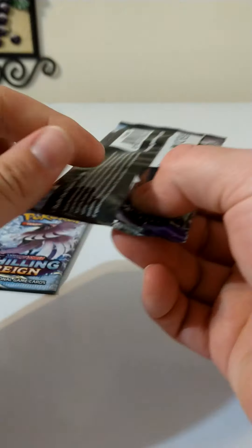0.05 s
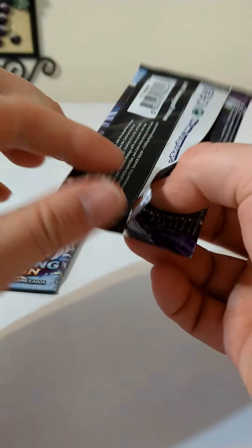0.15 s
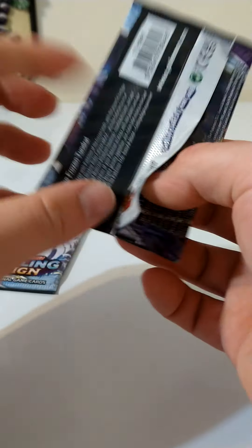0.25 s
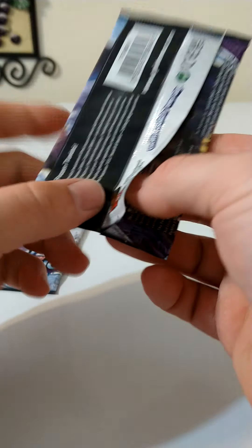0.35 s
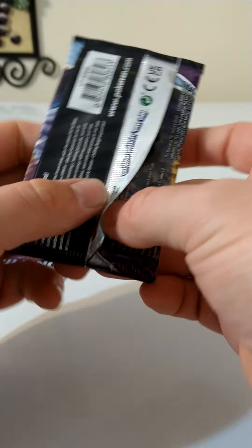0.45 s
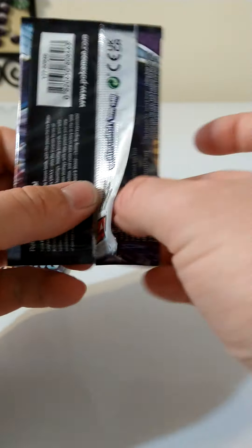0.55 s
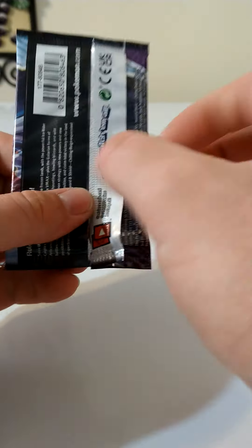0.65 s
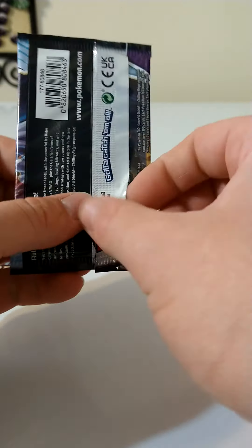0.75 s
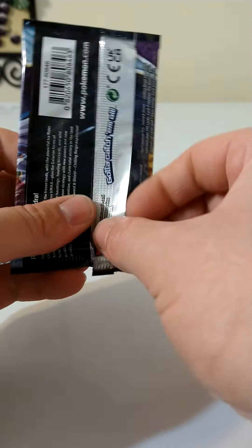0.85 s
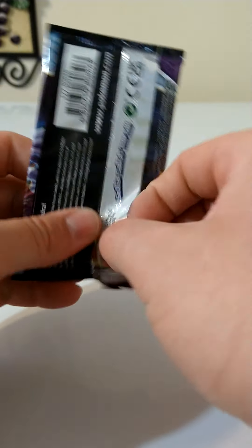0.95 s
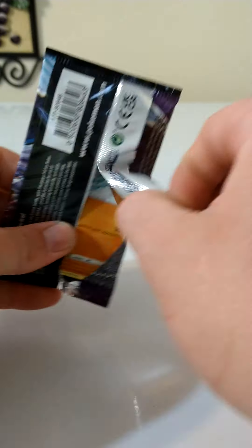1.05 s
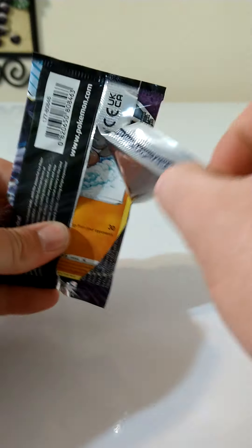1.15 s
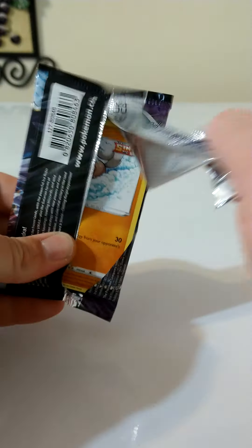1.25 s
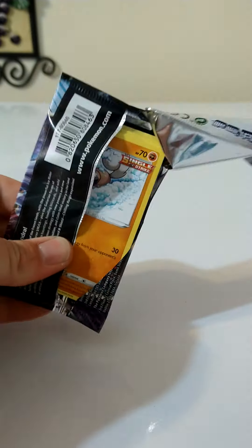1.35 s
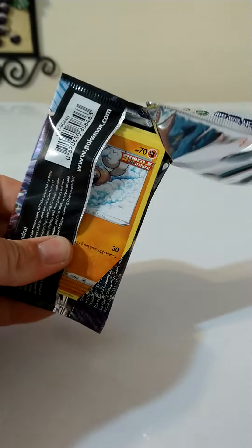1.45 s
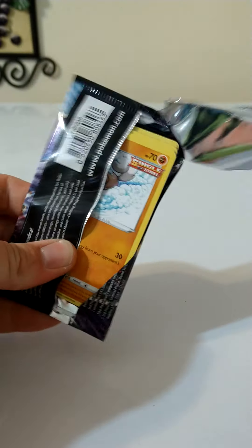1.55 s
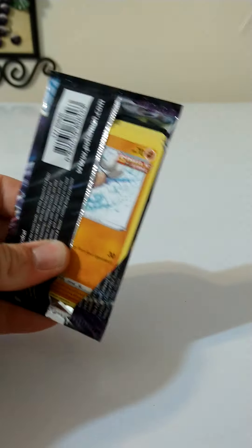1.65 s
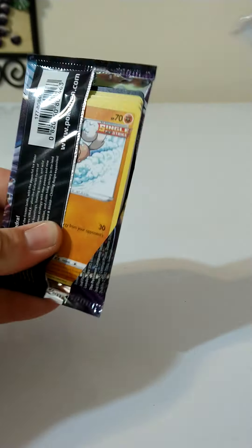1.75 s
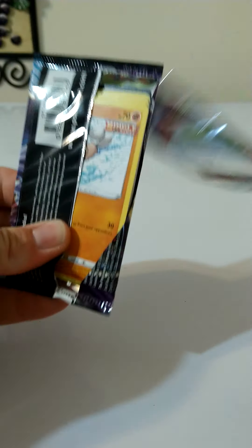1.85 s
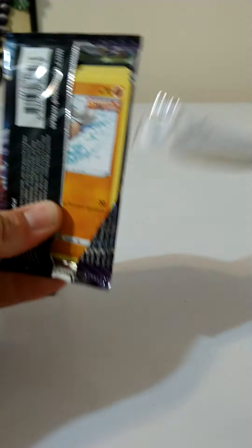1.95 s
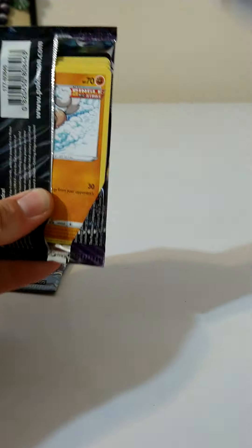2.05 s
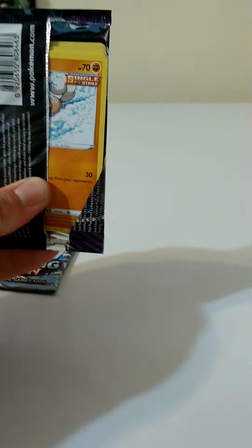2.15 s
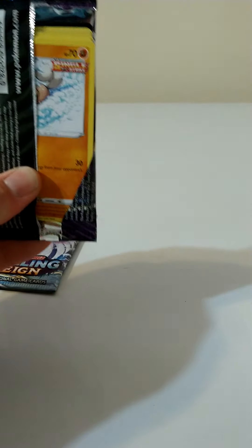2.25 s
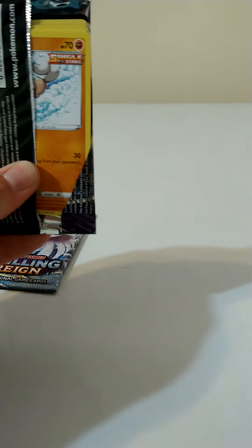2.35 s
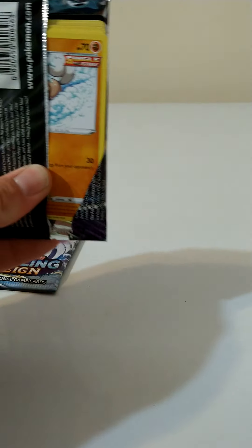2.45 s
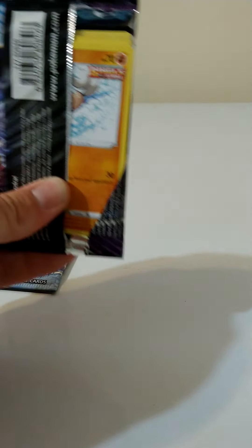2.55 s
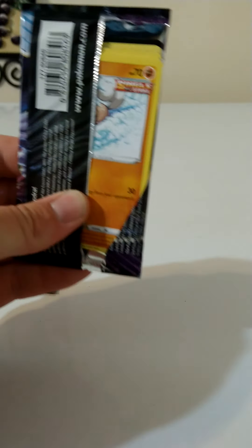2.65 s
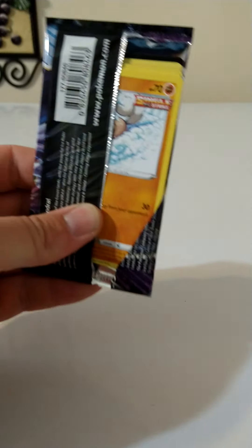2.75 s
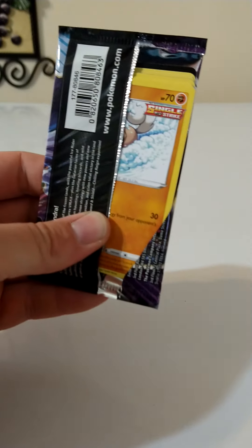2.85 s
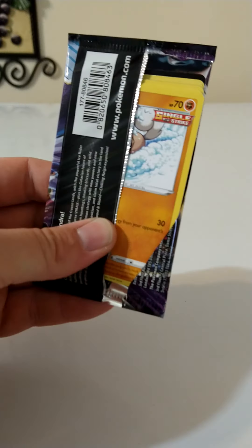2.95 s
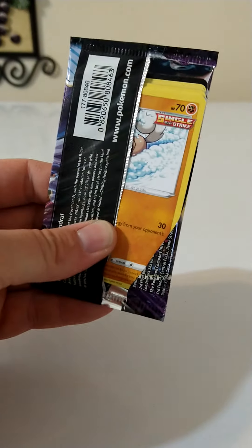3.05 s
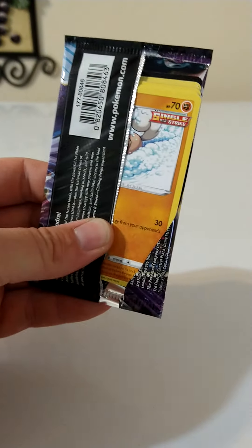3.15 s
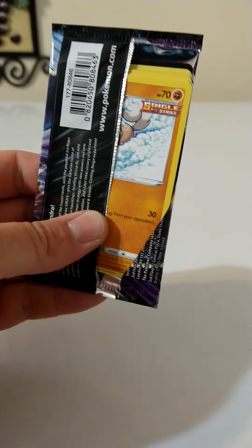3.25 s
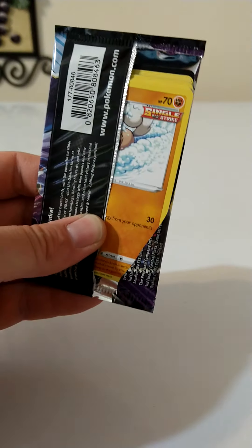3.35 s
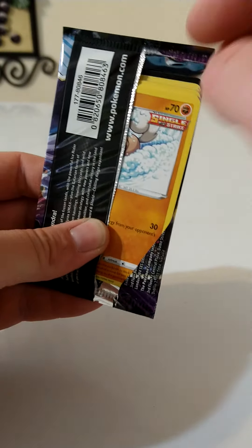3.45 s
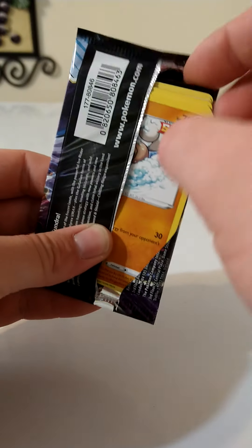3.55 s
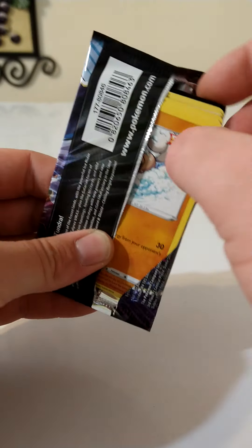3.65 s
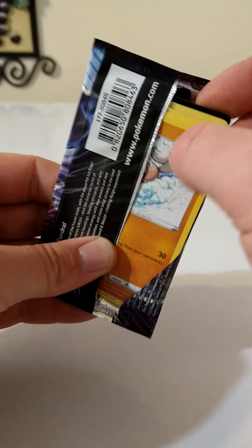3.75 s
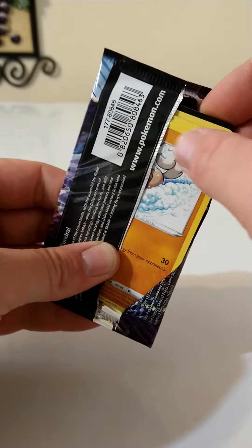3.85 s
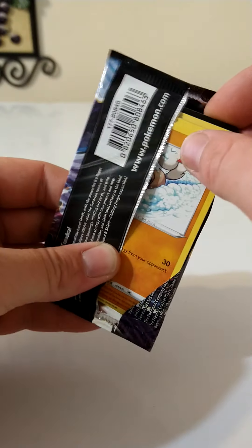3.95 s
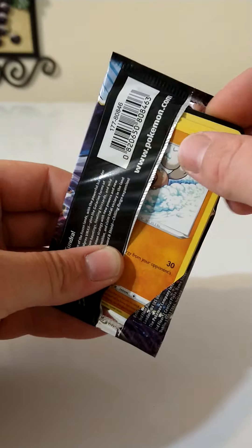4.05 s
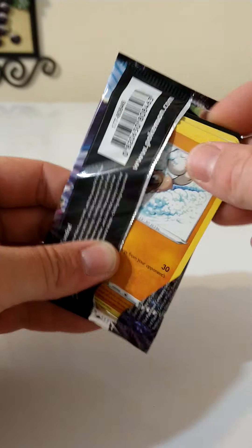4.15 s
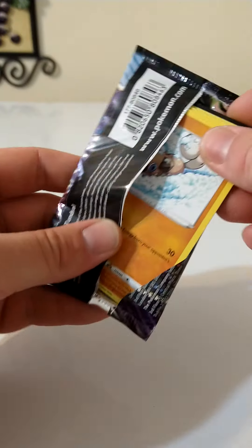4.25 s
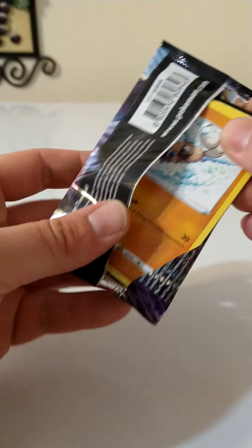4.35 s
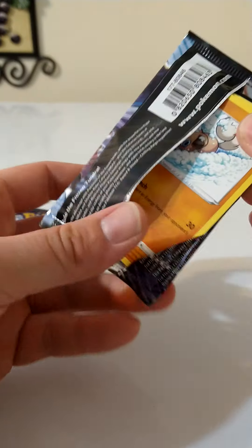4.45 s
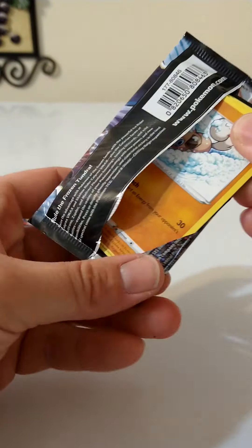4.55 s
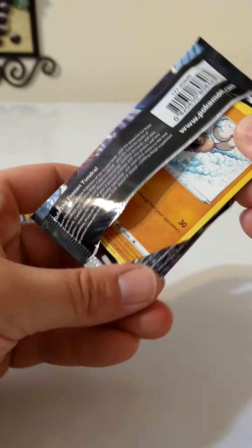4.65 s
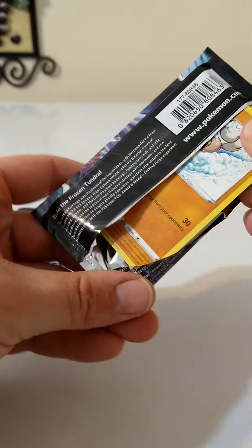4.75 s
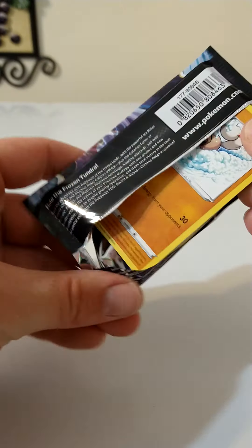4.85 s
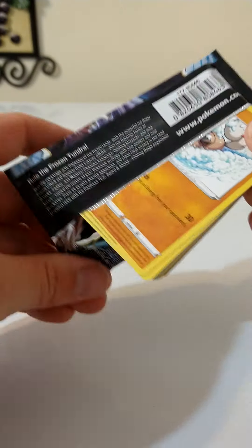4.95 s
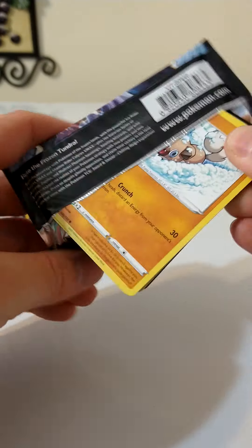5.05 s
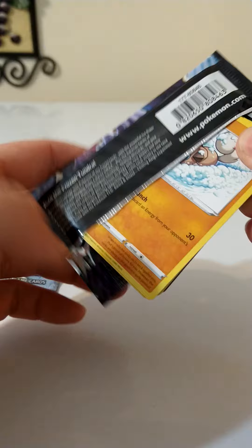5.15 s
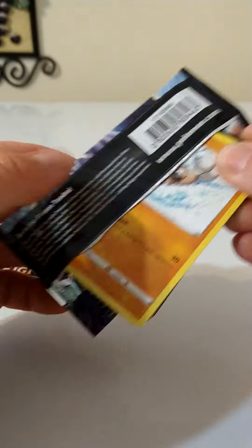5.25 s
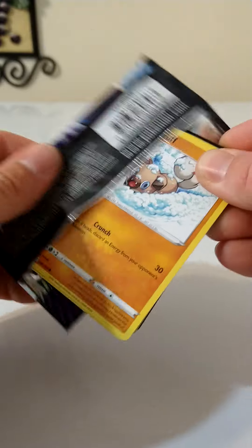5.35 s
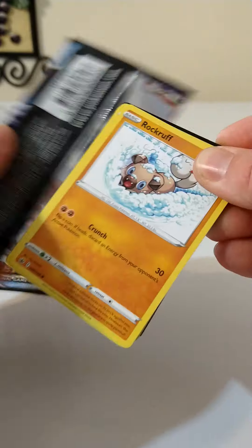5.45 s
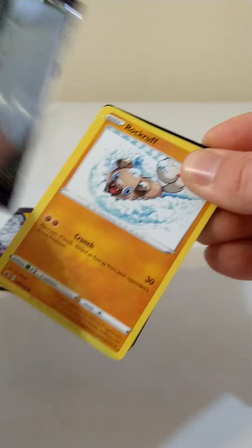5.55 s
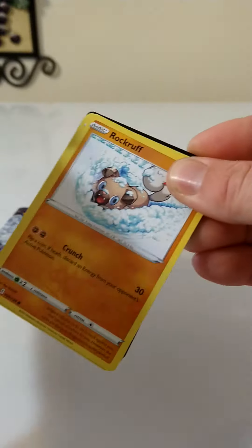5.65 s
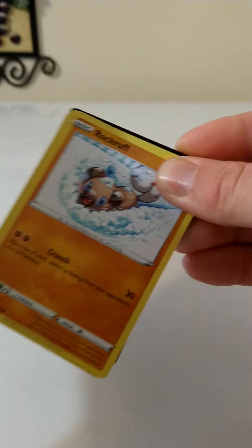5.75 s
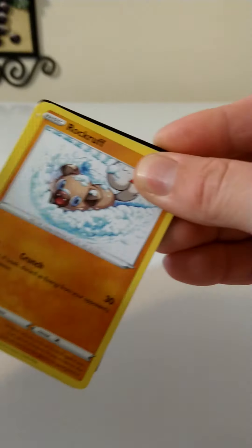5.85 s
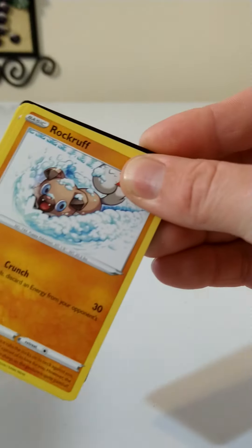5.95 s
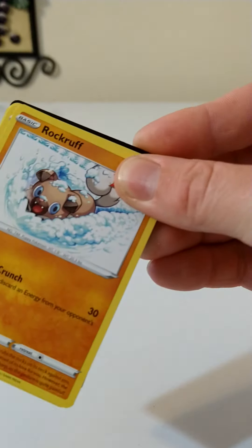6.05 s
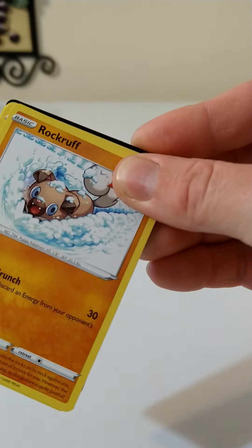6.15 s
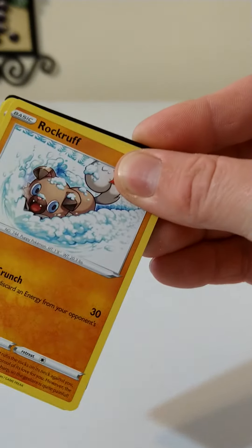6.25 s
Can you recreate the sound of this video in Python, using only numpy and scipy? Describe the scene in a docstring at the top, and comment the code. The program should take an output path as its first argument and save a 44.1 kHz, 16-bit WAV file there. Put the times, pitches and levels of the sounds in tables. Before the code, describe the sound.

Close foil crackling in a quiet room: faint ticks, a loud seam tear, sparse crinkles, then bright snaps, rustling and soft low bumps.

```python
"""Tearing a foil card pack

Hands peel open the sealed seam of a foil card pack, close to two microphones in a small quiet room.
Buckling facets are noise bursts with ringing modes; rips, creaks and rubbing are trains of tiny fractures.
Soft low bumps reach mostly the left microphone; echoes, a diffuse tail and still room air surround it all."""
import sys
import numpy as np
from scipy import signal
from scipy.fft import rfft, irfft
from scipy.io import wavfile
from scipy.ndimage import uniform_filter1d

SR = 44100
rng = np.random.default_rng(int(sys.argv[2]) if len(sys.argv) > 2 else 0)


def inscribe(sig):
    """Save sig as 16-bit PCM at rate SR to the path in sys.argv[1].

    A 1-D sig is mono; a 2-D sig holds one channel per row.
    Samples are clipped to [-1, 1] before scaling.
    """
    pcm = np.round(np.clip(np.atleast_2d(sig).T, -1, 1) * 32767)
    wavfile.write(sys.argv[1], SR, pcm.astype(np.int16))


N = 277389  # length in samples


def amp(db):
    """Logarithmic level: decibels become an amplitude ratio."""
    return 10 ** (np.asarray(db) / 20)


def unit(x):
    """Mean-square normalisation: scales a signal to rms 1."""
    return x / np.sqrt(np.mean(x ** 2) + 1e-20)


def read(points, hz):
    """Interpolation on a log-frequency axis, as the ear spaces pitch."""
    point_hz, value = np.transpose(points)
    return np.interp(np.log(hz + 1), np.log(point_hz + 1), value)


def sides(db):
    """Interaural level difference: left and right gains for left minus right in dB."""
    return amp(np.array([[db], [-db]]) / 2)


def add(mix, s, sound):
    """Superposition: adds a stereo sound to the mix at time s in seconds."""
    part = mix[:, max(round(s * SR), 0):][:, :sound.shape[1]]
    part += sound[:, :part.shape[1]]


def colour(x, points, size=2048):
    """Minimum-phase filtering: shapes the spectrum with energy 1 and keeps the fronts of clicks sharp."""
    log_gain = np.log(amp(read(points, abs(np.fft.fftfreq(size, 1 / SR)))))
    # the Hilbert transform of the log gain gives the minimum phase
    spectrum = np.exp(np.conj(signal.hilbert(log_gain)))
    taps = np.fft.ifft(spectrum).real[:size // 2]
    taps = taps / np.linalg.norm(taps)
    return signal.fftconvolve(x, taps[None], axes=1)[:, :x.shape[1]]


def pair(x, same):
    """Coherence: mixes two unrelated channels to the given correlation."""
    same = np.clip(same, -1, 1)
    right = same * x[0] + np.sqrt(1 - same ** 2) * x[1]
    return np.array([x[0], right])


def resonate(x, hz, width_hz):
    """Damped resonance: one broad peak of gain 1."""
    b, a = signal.iirpeak(hz, hz / width_hz, SR)
    return signal.lfilter(b, a, x)


def swell(start, crest, end, crest_db, rise_db, fall_db):
    """Force envelope: a movement builds to a crest, eases off and lets go, in straight lines of dB."""
    t = np.arange(N) / SR
    level_db = np.interp(t, [start, crest, end], [crest_db - rise_db, crest_db, crest_db - fall_db])
    return amp(level_db) * ((t >= start) & (t < end))


def fractures(per_s, spread_db, size=300):
    """Shot noise: a random train of tiny bursts of exponentially scattered level, scaled to rms 1."""
    level_db = spread_db * np.minimum(rng.exponential(1, N), 2.5)
    heights = amp(level_db) * (rng.random(N) < per_s / SR)
    t = np.arange(size) / SR
    burst = t * np.exp(-t / 0.00047)
    power = signal.oaconvolve(heights ** 2, burst ** 2)[:N]
    return unit(np.sqrt(abs(power)) * rng.standard_normal((2, N)))


# Spectrum of the still air. Each row: frequency in Hz, relative level in dB.
AIR_SPECTRUM = [(20, -48), (32, -26), (55, -6), (85, -11), (115, -6), (160, -12), (240, -8), (380, -9),
                (640, -14), (1000, -21), (2500, -25.5), (8000, -29), (11000, -35.5), (16000, -40)]
# Likeness of left and right in the still air. Each row: frequency in Hz, correlation from -1 to 1.
AIR_COHERENCE = [(60, 1), (130, 0.91), (290, 0.9), (640, 0.029), (1410, 0.94), (3100, -0.45), (6820, -0.96),
                 (15000, 0.16)]
AIR_DB = -64.0  # rms


def quiet():
    """Stationary noise: a low ventilation murmur under faint hiss, with its own coherence in each band."""
    hz = np.fft.rfftfreq(N, 1 / SR)
    bins = pair(rfft(rng.standard_normal((2, N))), read(AIR_COHERENCE, hz))
    return amp(AIR_DB) * unit(irfft(bins * amp(read(AIR_SPECTRUM, hz)), N))


# Echoes from hands and table top. Each row: delay in seconds, left gain, right gain.
ECHOES = [(.0021, 0.2, -.1), (.0043, -0.23, .12), (.0064, .1, .09)]
# Reverberation time of the diffuse tail. Each row: frequency in Hz, time to fall 60 dB in seconds.
ROOM_T60 = [(300, 0.19), (800, .3), (2000, 0.19), (5500, 0.17), (9000, 0.17), (15000, 0.15)]
# Starting spectrum of the tail. Each row: frequency in Hz, relative level in dB.
ROOM_COLOUR = [(100, -10.5), (500, -10.5), (900, -3), (2000, -3.5), (4000, -6.5), (7000, -4.5),
               (11000, -8.5), (15000, -3)]


def room(x, count=3):
    """Reverberation: close reflections, then exponentially decaying tails that take turns."""
    out = np.zeros((2, N))
    for delay, left, right in ECHOES:
        add(out, delay, x * np.array([[left], [right]]))
    for k in range(count):
        hz, t, z = signal.stft(rng.standard_normal((2, SR // 2)), SR, nperseg=256)
        decay_db = read(ROOM_COLOUR, hz)[:, None] - 60 * t / read(ROOM_T60, hz)[:, None]
        tail = signal.istft(z * amp(decay_db), SR, nperseg=256)[1]
        tail_t = np.arange(tail.shape[1]) / SR
        tail = tail * (1 - np.exp(-(tail_t / 0.0017) ** 2))  # soft onset
        tail = tail / np.linalg.norm(tail[0])
        # the share of each tail swings at 3.5 Hz while the summed power stays even
        share = np.sqrt(2 / count) * np.cos(np.pi * (7 * np.arange(N) / SR + k / count))
        out += amp(-6.5) * signal.fftconvolve(x * share, tail, axes=1)[:, :N]
    return out


# Soft low bumps. Each row: start in seconds, nominal level in dB, frequency in Hz.
BUMPS = [(1.202, -45, 67.4), (1.411, -43, 155), (1.518, -40, 86), (3.189, -48.5, 110), (5.122, -43, 86),
         (5.191, -37, 104), (5.354, -35.5, 104.3), (5.465, -38, 88), (5.52, -36.5, 89), (5.603, -37.5, 123),
         (5.734, -35.5, 129), (5.78, -36, 76), (5.827, -38.5, 104.7), (5.865, -28.5, 99), (5.908, -34, 93),
         (5.954, -30.5, 78), (6.039, -46, 115)]
# Spectrum of their rumble. Each row: frequency in Hz, relative level in dB.
RUMBLE_SPECTRUM = [(20, -30), (50, -8), (90, 2.5), (140, -3.5), (220, -14.5), (400, -30.5), (1000, -69)]


def bumps(size=6000):
    """Near-field pressure pulses: a low push and ragged rumble, almost wholly on the left microphone."""
    lead = 0.025  # s of swelling before the start
    t = np.arange(size) / SR - lead
    out = np.zeros((2, N))
    for s, level_db, hz in BUMPS:
        push = np.exp(-((t - .007) / 0.0099) ** 2) * np.sin(2 * np.pi * hz * t)
        noise = rng.standard_normal((1, size)) * np.exp(-abs(t) / 0.017)
        rumble = unit(colour(noise, RUMBLE_SPECTRUM))
        bump = amp(level_db) * (0.59 * push + 0.18 * rumble)
        add(out, s - lead, bump * amp([[3.0], [-20.0]]))
    return out


# Strokes of fingers and cards over the foil.
# Each row: start in seconds, crest in seconds, end in seconds, crest drive level in dB.
STROKES = [(0, .03, 1.5, -57.5), (1.053, 1.364, 2.4, -52.5), (2.303, 2.354, 2.56, -64),
           (2.55, 2.78, 3.2, -71.5), (3.07, 3.17, 3.34, -65.5), (3.66, 3.738, 4.54, -65.5),
           (4.1, 4.26, 4.42, -63.5), (4.42, 4.48, 4.58, -56.5), (4.718, 4.806, 4.9, -50.5),
           (4.925, 5.145, 5.43, -52), (5.599, 5.777, 5.88, -50.5), (5.873, 5.95, 6.15, -65)]
STROKE_RISE_DB, STROKE_FALL_DB = 14, 13
HOLD_DB = -82.5  # drive level of the resting grip


def rubbing():
    """Friction drive: all the strokes, with softened ends, over the faint rub of a resting hand."""
    strokes = sum(swell(*row, STROKE_RISE_DB, STROKE_FALL_DB) for row in STROKES)
    return uniform_filter1d(strokes, size=900) + amp(HOLD_DB)


# Spectrum of skin and cards on foil. Each row: frequency in Hz, relative level in dB.
RUB_SPECTRUM = [(1060, -42), (1800, -10.5), (2920, -11), (4370, -6.5), (5200, -9), (7090, -6), (11700, -18),
                (13900, -20), (16000, -22)]


def slide():
    """Sliding friction: skin and cards drag over the foil as a dense train of small slips."""
    slips = fractures(per_s=1300, spread_db=-0.5)
    return amp(-4.5) * colour(slips * rubbing(), RUB_SPECTRUM)


# Tugs that strain the sealed seam before it gives.
# Each row: start in seconds, crest in seconds, end in seconds, crest drive level in dB.
TUGS = [(.845, 0.853, .96, -55), (.96, 0.987, 1.04, -53), (1.045, 1.07, 1.1, -60), (1.1, 1.12, 1.16, -31)]
TUG_RISE_DB, TUG_FALL_DB = 16, 14
# Band of the stretched foil. Each row: frequency in Hz, relative level in dB.
CREAK_SPECTRUM = [(3000, -36), (4600, -14.5), (5200, 2.5), (5900, -13.5), (7400, -4.5), (9000, -27.5),
                  (14000, -33.5)]


def creak():
    """Fibre fracture under strain: parting glue excites a narrow band of the stretched foil."""
    strain = sum(swell(*row, TUG_RISE_DB, TUG_FALL_DB) for row in TUGS)
    return colour(fractures(per_s=1500, spread_db=5.5) * strain, CREAK_SPECTRUM)


MEDIUM_HZ, MEDIUM_DB = 6450, -25.5  # ring and level of a medium snap
TICK_DB, TICK_SCATTER_DB = 11.5, 2.5  # nominal level above the rubbing drive, and its scatter


def stray_ticks(count=40):
    """Random buckling: small facets give way at levels that follow the rubbing drive."""
    rub_db = 20 * np.log10(abs(rubbing()) + 1e-6)
    places, chance = rng.integers(0, N, count), rng.standard_normal((count, 3))
    rows = []
    for at, (size, pitch, side) in zip(places, chance):
        level_db = rub_db[at] + TICK_DB + TICK_SCATTER_DB * size
        rows.append((at / SR, level_db, MEDIUM_HZ * 2 ** (.3 * pitch), 4.8 * side))
    return rows


# mean wait in seconds, level relative to the snap in dB, pitch scatter in octaves
FOLLOW_S, FOLLOW_DB, FOLLOW_OCTAVES = .005, -20, 0.22


def neighbours(count=2):
    """Cascade buckling: each snap tips its neighbours over, weaker and at uneven waits."""
    rows = []
    for s, peak_db, hz, _, pan_db in SNAPS:
        wait, size, pitch, side = rng.uniform(-1, 1, (count, 4)).T
        times = s + np.cumsum(FOLLOW_S * (1 + .7 * wait))
        levels_db = peak_db + FOLLOW_DB + 3.5 * size
        rows += zip(times, levels_db, hz * 2 ** (FOLLOW_OCTAVES * pitch), pan_db + 4.0 * side)
    return rows


def ring(peak_db, hz, pan_db, count=4, size=500):
    """Modal vibration: a cluster of close, damped modes, detuned and phased apart on each side."""
    t = np.arange(size) / SR
    detune, phase = rng.uniform(-1, 1, (2, count, 2, 1))
    modes = np.sin(2 * np.pi * (hz * (1 + .13 * detune) * t + phase)).sum(0)
    envelope = (t / .0005) ** 2 * np.exp(-t / 0.00068)
    return amp(peak_db - 16.5) * unit(modes * envelope) * sides(pan_db)


CRACK_S = .00046  # time constant of a facet flipping


def facet_flip(t):
    """Snap-through: a sudden rise and exponential fall as a facet changes shape."""
    return (t / CRACK_S) ** 2 * np.exp(-t / CRACK_S)


# Spectrum of the foil sheet. Each row: frequency in Hz, relative level in dB.
FOIL_SPECTRUM = [(300, -37), (1000, -27), (2000, -11), (2850, -6.5), (3500, 0), (5500, 1), (7800, 0.5),
                 (10000, 0), (12000, -8.5), (14000, -7), (16000, -14.5)]


def crinkles(size=500):
    """Small-scale buckling: each facet ticks and rings briefly, too weak to knock the pack."""
    t = np.arange(size) / SR
    ticks, rings = np.zeros((2, 2, N))
    for s, peak_db, hz, pan_db in stray_ticks() + neighbours():
        tick = unit(facet_flip(t) * rng.standard_normal((2, size)))
        add(ticks, s, amp(peak_db - 17.0) * tick * sides(pan_db))
        add(rings, s, ring(peak_db, hz, pan_db))
    return colour(ticks, FOIL_SPECTRUM) + rings


# Runs of tiny fractures as the seam parts or the foil crumples.
# Each row: start in seconds, crest in seconds, end in seconds, crest drive level in dB,
# pack level setting in dB, ring in Hz.
RIPS = [(.002, 0.006, 0.019, -30, -10, 7160), (1.101, 1.15, 1.253, -35, 4, 5100),
        (1.244, 1.267, 1.292, -44.5, 10.5, 5990), (1.369, 1.392, 1.47, -37.5, 5.5, 4520),
        (1.4, 1.44, 1.503, -25, 0, 6200), (1.619, 1.663, 1.68, -39.5, 0, 4530),
        (1.692, 1.695, 1.754, -26, -5, 7050), (1.741, 1.76, 1.801, -32, 1.5, 4180),
        (3.884, 3.887, 3.92, -44, -16, 4400), (4.128, 4.137, 4.175, -47, -9, 4600),
        (4.277, 4.318, 4.336, -47, -2, 7300), (5.012, 5.003, 5.062, -27.5, -6, 8200),
        (5.143, 5.233, 5.22, -50, -7, 7900), (5.451, 5.496, 5.53, -41, -0.5, 8000),
        (5.523, 5.562, 5.593, -38, 3.5, 6800)]
RIP_RISE_DB, RIP_FALL_DB = 8, 13.5
# Spectrum of the hollow pack. Each row: frequency in Hz, relative level in dB.
PACK_SPECTRUM = [(60, -17), (200, -10), (290, -10.5), (345, -1.5), (420, -9.5), (520, -8.5), (640, 1),
                 (780, -2), (920, -7.5), (1150, -1.5), (1500, -5), (2200, -7.5), (3200, -10), (6000, -37)]


def rips():
    """Fracture-driven resonance: dense breaks in the seam ring the taut sheet and shake the pack."""
    out = np.zeros((2, N))
    grains = fractures(per_s=450, spread_db=3.0)
    sheet = colour(grains, FOIL_SPECTRUM)
    pack = colour(pair(grains, 0.98), PACK_SPECTRUM) * sides(1.0)
    for start, crest, end, crest_db, pack_db, hz in RIPS:
        pull = swell(start, crest, end, crest_db, RIP_RISE_DB, RIP_FALL_DB)
        run = pull > 0
        taut = resonate(sheet[:, run], hz, width_hz=3700)
        layers = amp(-3.5) * sheet[:, run] + amp(-1.0) * taut + amp(pack_db - 14.0) * pack[:, run]
        add(out, start, pull[run] * layers)
    return out


def facet_colour(hz, top_db):
    """Resonant radiation: a facet is favoured near its ring, with chance humps and more or less treble."""
    f = np.geomspace(300, 16000, num=24)
    near_ring = -3.0 * np.minimum(abs(np.log2(f / hz)), 1)
    top = 0.76 * (top_db + 18.5) * np.clip((f - 8500) / 3500, 0, 1)
    humps_db = 2.2 * rng.standard_normal(len(f))
    return np.transpose([f, read(FOIL_SPECTRUM, f) + near_ring + top + humps_db])


def crack(peak_db, hz, body_db, top_db, pan_db, size=1600):
    """Impulsive excitation: a flipping facet bursts, flutters as it settles and knocks the hollow pack."""
    t = np.arange(size) / SR
    crack_noise, body_noise = rng.standard_normal((2, 2, size))
    flip = facet_flip(t) + 0.018 * np.exp(-t / 0.015)  # the slow part is the flutter
    burst = unit(colour(pair(crack_noise, 0.065) * flip, facet_colour(hz, top_db)))
    burst[1] = np.interp(t - .00016, t, burst[1], left=0)  # the right microphone is a little farther away
    thud = (1 - np.exp(-t / .001)) * np.exp(-t / .003)
    knock = unit(colour(pair(body_noise, 0.9) * thud, PACK_SPECTRUM)) * sides(-3.0)
    return amp(peak_db - 21.5) * (burst + amp(body_db + 8.5) * knock) * sides(pan_db)


# treble setting of a medium snap in dB, its growth in dB per octave of ring and in dB per dB of level
TOP_DB, TOP_DB_PER_OCTAVE, TOP_DB_PER_DB = -20, 11, 0.28
# Single buckles of foil facets. Each row: start in seconds, nominal peak level in dB, ring in Hz,
# level setting of the hollow pack's knock relative to the snap in dB, left minus right in dB.
SNAPS = [(.0074, -27, 5900, -23.5, -2), (0.0278, -31.5, 8950, -22, 10), (0.0395, -20, 7060, -39, 2),
         (0.0781, -30.5, 7200, -20.5, 1), (0.2609, -32, 5800, -24.5, 4), (.2836, -40.5, 5340, -14, 6),
         (0.364, -26, 6380, -25.5, -3), (.5232, -41.5, 6340, -9.5, 5.5), (0.5469, -40.5, 4200, -30, 6),
         (0.6755, -37, 8600, -17.5, 2), (0.7245, -30, 5370, -22, 6.5), (.7334, -37.5, 5230, -20, -9),
         (0.8509, -37, 7360, -20, 5), (0.9104, -40, 7200, -23, 0), (0.935, -33.5, 7300, -27, 4),
         (0.9636, -33.5, 5760, -16.5, -3.5), (1.0087, -33.5, 6100, -20.5, 0),
         (1.0509, -20, 5390, -23, -0.5), (1.1068, -23, 5070, -34, 5.5), (1.1121, -15, 5270, -35, -3),
         (1.1432, -10.5, 4700, -23.5, -5), (1.1498, -6.5, 5050, -33.5, 0.5), (1.1595, -10, 9340, -18, -4),
         (1.17, -5, 7250, -25.5, 0.5), (1.1753, -8, 8030, -37, 6.5), (1.2028, -15.5, 5760, -26, -2),
         (1.2129, -7.5, 7630, -25, 3.5), (1.2294, -18.5, 4740, -21, 4), (1.2607, -19.5, 6340, -16.5, -5.5),
         (1.3142, -37.5, 6250, -8.5, 4), (1.3428, -25.5, 6397, -14, 3.5), (1.3799, -25.5, 4400, -12.5, -2),
         (1.4047, -9.5, 4530, -17.5, 1), (1.4202, -4, 6850, -16, -5), (1.4268, -3, 8950, -42, -2),
         (1.4461, -6.5, 6800, -32, 2), (1.4494, -6, 6540, -26, -8), (1.6046, -31, 4270, -13.5, 0),
         (1.6194, -15, 7570, -27, 1), (1.661, -18, 7620, -16.5, 0), (1.6973, -12.5, 8520, -17.5, 6),
         (1.7081, -4, 3550, -26.5, 3), (1.7208, -17, 4080, -33, -6), (1.889, -26, 8800, -27, -3),
         (2.0391, -47.5, 3950, -1.5, 12), (2.2033, -42.5, 3170, -8, 6), (2.288, -44.5, 7700, -5, 2),
         (2.7778, -33.5, 7670, -8, 0.5), (2.8452, -39, 3930, -12.5, 1), (2.8746, -31.5, 4950, -16.5, -1.5),
         (3.0615, -38.5, 5170, -18.5, -3), (3.1359, -35.5, 7580, -15.5, 0), (3.6533, -41, 3410, -15, -3),
         (3.703, -32, 5970, -12.5, 1), (3.7423, -37.5, 4250, -39, 4), (3.8336, -34.5, 7240, -21, -1.5),
         (3.8759, -31.5, 3430, -32, 8), (3.8831, -19.5, 8200, -27, -2), (3.9722, -42, 4000, -14, 0),
         (4.0989, -34, 6760, -25, 4), (4.1025, -28.5, 4170, -25, 0), (4.142, -27.5, 8290, -18.5, -2),
         (4.2926, -34, 9020, -24.5, 2), (4.4545, -28, 5700, -20.5, 4), (4.472, -34.5, 8100, -22, -3),
         (4.5255, -32, 4030, -17.5, -0.5), (4.6388, -43.5, 4040, -10.5, -0.5), (4.6583, -43, 5580, -24, 7),
         (4.6775, -31, 4500, -28.5, 6), (4.685, -26.5, 5000, -27.5, 1.5), (4.8186, -29.5, 5000, -17.5, 5.5),
         (4.9065, -50, 2950, 0, 5.5), (4.9571, -37, 4800, -19, -0.5), (4.9922, -30, 5980, -26, 7),
         (5.0113, -14.5, 8200, -21.5, -1), (5.0148, -6.5, 8060, -25.5, 4),
         (5.0496, -10.5, 6420, -17.5, 0.5), (5.0542, -7.5, 7460, -38, -3), (5.1545, -28, 8470, -17.5, 0),
         (5.1822, -25, 8250, -25, 1), (5.212, -16.5, 8020, -34, 0), (5.224, -12.5, 7350, -23, 0.5),
         (5.2698, -27, 5700, -21.5, 0), (5.3261, -23, 7770, -32, -2), (5.4852, -23, 7260, -24, 7),
         (5.515, -19, 6530, -18.5, -0.5), (5.5343, -22, 6730, -23, 12), (5.5512, -19.5, 6840, -22, -7),
         (5.7639, -34.5, 7970, -10.5, 0.5), (5.9379, -27.5, 7040, -17, 2), (6.151, -31.5, 5480, -18.5, -1),
         (6.1876, -39.5, 7908, -17, -6), (6.2327, -28, 6470, -16.5, -3)]


def snaps():
    """Snap-through buckling: each facet gives a broad crack and a pitched ring, brighter when strong."""
    cracks, rings = np.zeros((2, 2, N))
    for s, peak_db, hz, body_db, pan_db in SNAPS:
        octaves = np.log2(hz / MEDIUM_HZ)
        top_db = TOP_DB + TOP_DB_PER_OCTAVE * octaves + TOP_DB_PER_DB * (peak_db - MEDIUM_DB)
        add(cracks, s, crack(peak_db, hz, body_db, top_db, pan_db))
        add(rings, s, ring(peak_db, hz, pan_db))
    return cracks, rings


def scene():
    """Directivity: the snaps' rings are beamed narrowly, so less of them feeds the reverberation."""
    cracks, rings = snaps()
    foil = cracks + crinkles() + rips() + creak() + slide()
    reverberation = room(foil + .5 * rings)
    return foil + rings + reverberation + bumps() + quiet()


EDGE_HZ = 16100  # upper band edge


def record(dry):
    """Amplitude and band limiting: peaks clip at 0.9, then a linear-phase filter removes the top band."""
    low_pass = signal.firwin(255, EDGE_HZ, window=("kaiser", 8), fs=SR)
    limited = np.clip(dry, -.9, .9)
    return signal.oaconvolve(limited, low_pass[None], "same")


dry = scene()
out = record(dry)
inscribe(out)
```